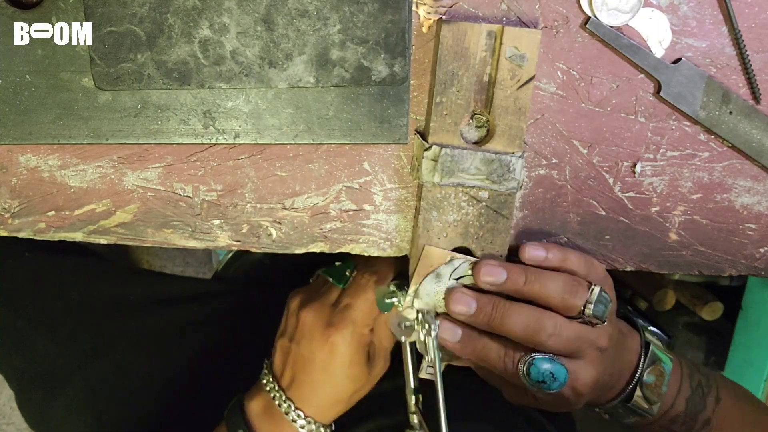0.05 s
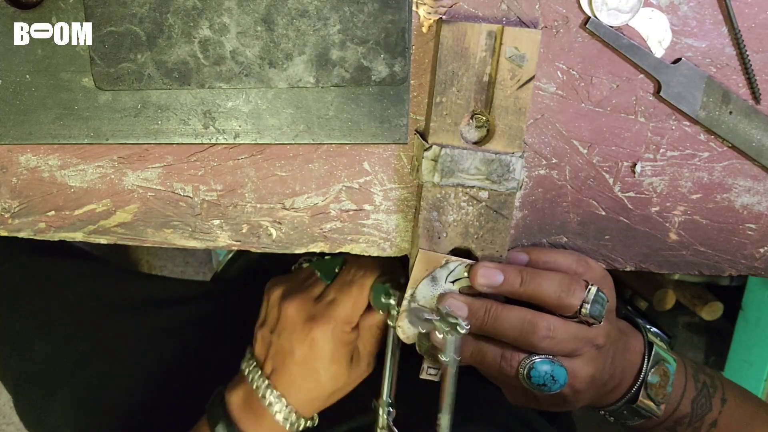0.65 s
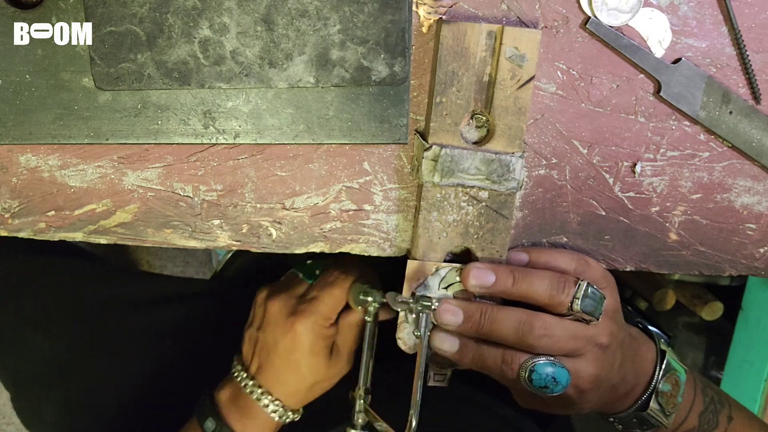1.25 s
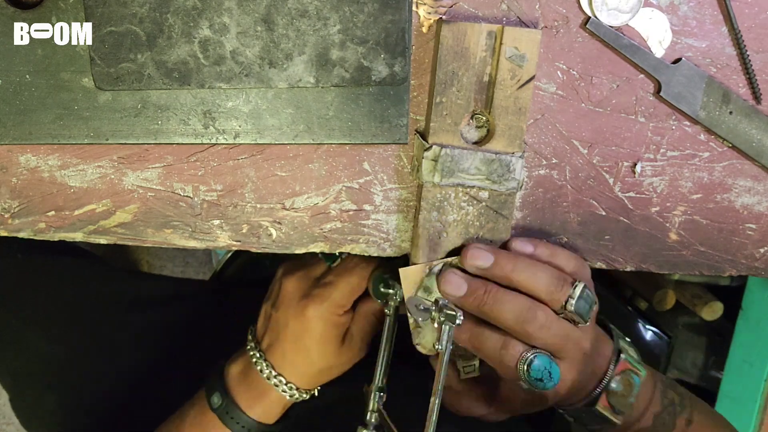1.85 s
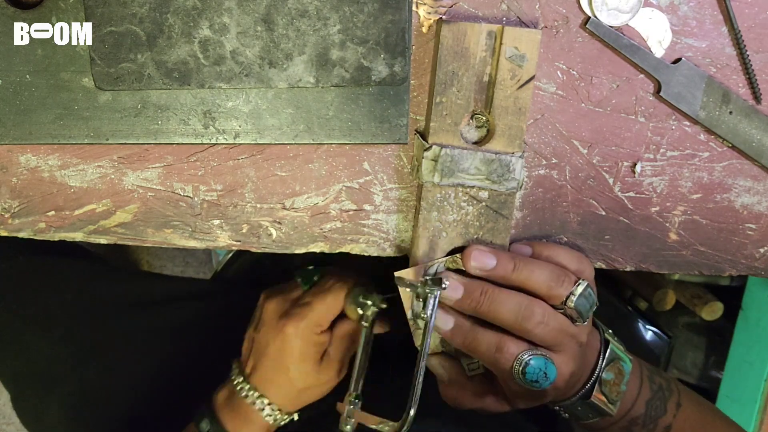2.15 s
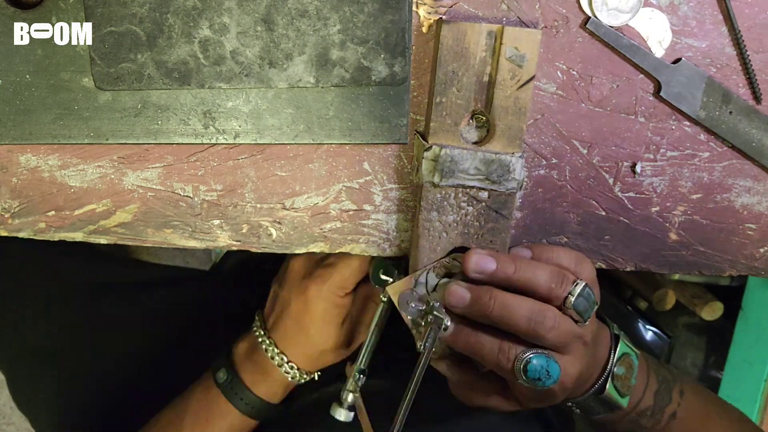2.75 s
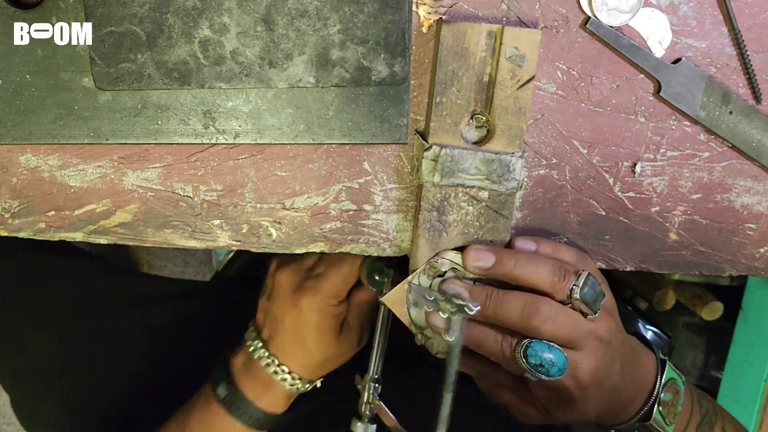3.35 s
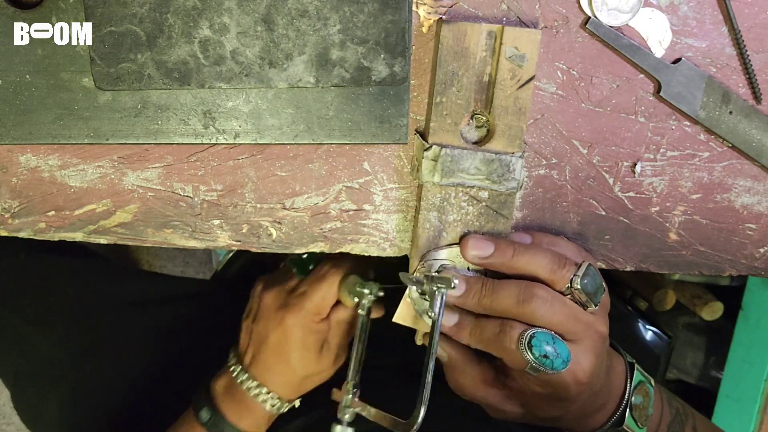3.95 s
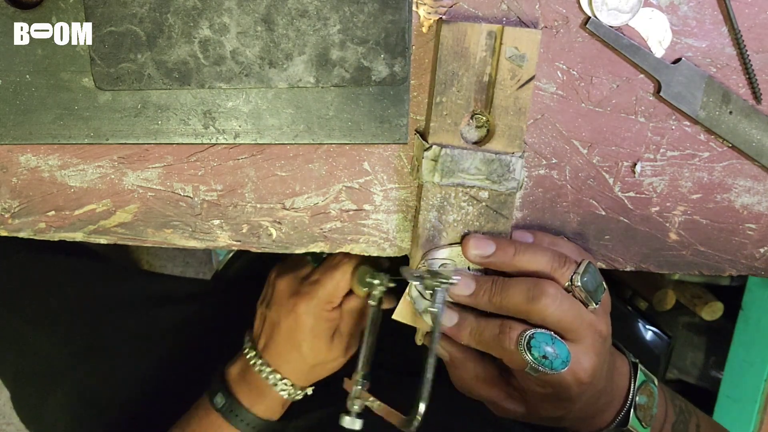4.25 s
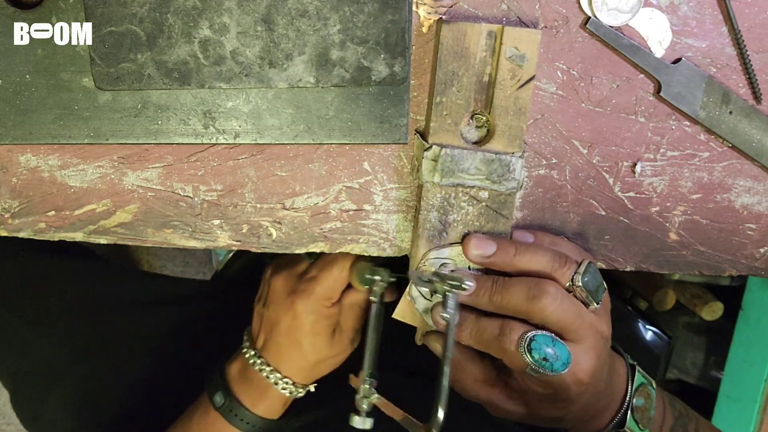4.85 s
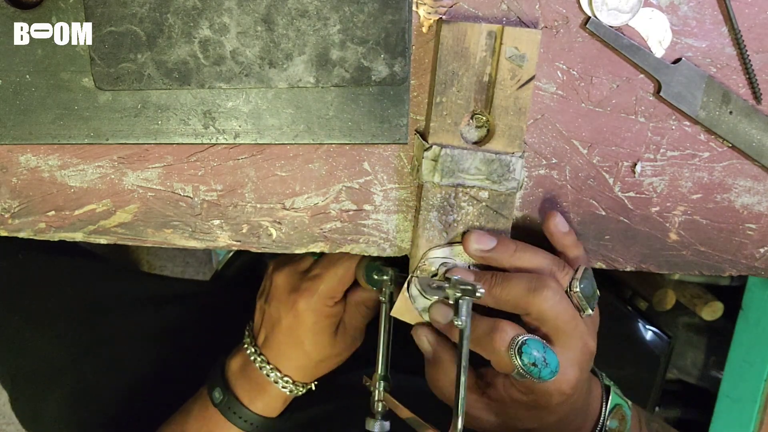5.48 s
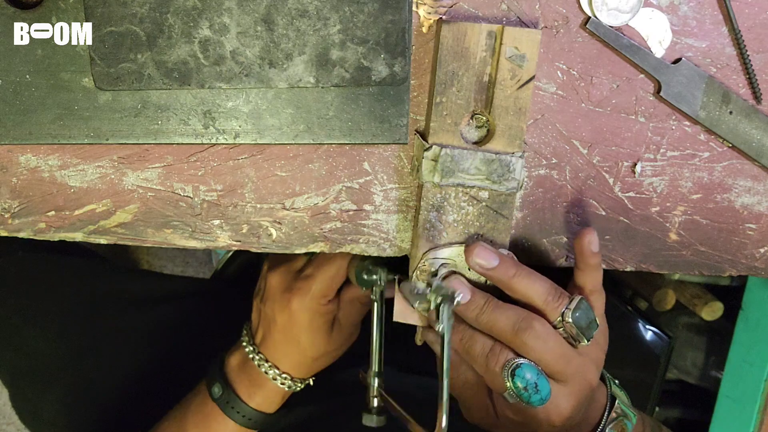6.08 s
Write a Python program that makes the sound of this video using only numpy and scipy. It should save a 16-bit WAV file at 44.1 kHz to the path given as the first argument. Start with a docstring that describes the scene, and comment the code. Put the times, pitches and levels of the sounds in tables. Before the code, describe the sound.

A fine-toothed hand saw rasps through a small metal plate, close by in a quiet workshop. The strokes are at first very fast, as if sped up, and come in runs split by abrupt little gaps. They then give way to slower strokes that rise and fall in pitch. The metal rings thinly while the wooden bench rumbles and thuds softly. At the end the saw frame knocks with a sharp click.

```python
"""Sawing a small metal plate

A fine-toothed hand saw rasps through a plate held on a wooden bench peg, close by in a workshop.
Very fast strokes, sounding sped up and broken by abrupt gaps, give way to slow ones that arch in pitch.
Tooth impacts and chip noise force plate and saw frame to resonate, while the bench rumbles and thuds.
The frame knocks on the peg now and then, hardest at the end, where it also snaps against the plate."""
import sys
import numpy as np
from scipy import signal
from scipy.fft import rfft, irfft, next_fast_len
from scipy.io import wavfile
from scipy.ndimage import uniform_filter1d, map_coordinates

SR = 44100
rng = np.random.default_rng(int(sys.argv[2]) if len(sys.argv) > 2 else 0)


def log_audio(samples):
    """Write samples as a 16-bit WAV file to the path given in sys.argv[1]."""
    # one column per channel
    frames = np.atleast_2d(samples).T
    # limit to full scale, then quantise
    limited = np.clip(frames, -1, 1)
    pcm = np.round(limited * 32767).astype(np.int16)
    wavfile.write(sys.argv[1], SR, pcm)


N = 269892
TIME = np.arange(N) / SR
SIZE = next_fast_len(N + 16384)
FREQ = np.arange(SIZE // 2 + 1) * SR / SIZE

# Runs of quick strokes, each with its own grip: (first t/s, last t/s, strokes, level/dB, attack/s,
# release/s, low plate tones/dB, upper plate tones/dB, frame/dB, bench rumble/dB)
QUICK_RUNS = [(0.003, 0.068, 3, -26.5, 0.0062, 0.025, 1.5, -3, -8, -33.5),
              (0.143, 0.273, 5, -28, 0.051, 0.0049, -8, -5, -7.5, -37),
              (0.48, 0.518, 2, -28.5, 0.013, 0.016, 3.5, 4, -0.5, -36),
              (0.552, 0.815, 9, -27.5, 0.072, 0.027, 0.5, 3, -2, -44.5),
              (0.905, 1.281, 12, -29.5, 0.072, 0.0064, 0.5, 1.5, -5, -45),
              (1.317, 1.714, 12, -27, 0.012, 0.054, 0.5, -2, -6, -46),
              (1.773, 2.525, 22, -27.5, 0.011, 0.015, 1.5, -2.5, -10.5, -47),
              (2.596, 2.635, 2, -42, .01, 0.12, 3.5, -2.5, -7, -48),
              (2.728, 3.438, 21, -26.5, 0.043, 0.054, 1, -7, -8, -40.5),
              (3.49, 3.698, 7, -27, 0.024, 0.011, -1, -4, -4.5, -41),
              (3.87, 4.292, 13, -27, 0.081, 0.011, 2, -3.5, -7.5, -41.5)]
# Slow strokes: (start t/s, end t/s, mid-stroke tooth f/Hz, level/dB,
# swell exponent (1 is round, more is pointed), plate tones/dB, bench rumble/dB)
SLOW_STROKES = [(4.305, 4.417, 799.5, -21.5, 2.6, -0.5, -39.5), (4.415, 4.562, 980, -18.5, 1.1, -3, -40.5),
                (4.552, 4.709, 846.6, -19.5, 1.08, 1, -38), (4.716, 4.874, 637.8, -23, 1.05, 0, -37.5),
                (4.886, 5.032, 713, -24, 1.36, 1.5, -42.5), (5.037, 5.185, 846.6, -22, 0.85, 0, -42),
                (5.178, 5.333, 798.7, -22.5, 1.35, 1, -43), (5.344, 5.483, 469, -31.5, 0.83, 0, -44),
                (5.56, 5.691, 334, -49, 0.9, 3, -48.5), (5.81, 5.999, 625, -31, 2.1, -1.5, -54.5),
                (6, 6.127, 557, -27.5, 1.33, 1, -46.5)]
# Snags of the blade within a stroke: (t/s, level/dB)
BLADE_SNAGS = [(.278, -28), (.68, -28.5), (.745, -27.5), (.975, -29.5), (1.005, -26.5), (1.107, -26.5),
               (1.387, -29), (1.458, -27.5), (1.496, -30), (1.566, -24.5), (1.642, -30.5), (1.805, -22.5),
               (1.881, -25.5), (1.917, -26), (1.95, -28.5), (2.021, -26.5), (2.128, -24), (2.165, -29),
               (2.38, -26.5), (2.415, -26.5), (2.487, -23.5), (2.795, -30), (2.972, -31), (3.006, -34),
               (3.146, -29.5), (3.33, -29), (3.555, -22.5), (3.665, -30.5), (3.696, -30), (4.015, -28),
               (4.08, -31.5), (4.114, -32), (4.336, -17.5), (4.358, -26.5), (4.436, -31), (4.525, -29),
               (4.59, -19.5), (4.62, -14), (4.781, -17.5), (4.935, -23), (5.142, -21.5), (5.218, -24.5),
               (5.535, -53)]
# Spectral envelope of plate and frame in slow strokes and ticks: (f/Hz, level/dB)
METAL_SPECTRUM = [(150, -31.5), (400, -7), (620, -5.5), (1300, -4.5), (2600, -7), (4600, -9.5),
                  (6900, -0.5), (8600, 4), (9600, -2), (10700, -18), (15500, -20.5)]
# Their resonances and one antiresonance: (f/Hz, bandwidth/Hz, gain/dB)
METAL_MODES = [(389, 60, 11), (528.8, 57, 13.5), (790, 110, 3), (943, 84, -17.5), (1560, 65.3, 9.5),
               (2428, 220, 5.5), (3970, 220, 5.5), (6090, 190, 5.5), (6830, 120, 8)]
QUICK_PART = TIME < SLOW_STROKES[0][0]


def undb(db):
    """Amplitude ratio of a level in decibels."""
    return 10 ** (np.asarray(db) / 20)


def unit(x):
    """Normalisation to an rms of 1."""
    return x / np.sqrt(np.mean(np.abs(x) ** 2))


def spectrum_db(points):
    """Interpolation of (f/Hz, level/dB) points on a logarithmic frequency axis."""
    hz, db = np.transpose(points)
    return np.interp(np.log(FREQ + 1), np.log(hz), db)


def minimum_phase(gain):
    """Causality: a minimum-phase response of this gain rings after a blow, never before."""
    cepstrum = irfft(np.log(gain + 1e-7), SIZE)
    cepstrum[..., 1:SIZE // 2] *= 2
    cepstrum[..., SIZE // 2 + 1:] = 0
    return np.exp(rfft(cepstrum))


def through(x, response):
    """Linear filtering: the spectrum is multiplied by a frequency response."""
    return irfft(rfft(x, SIZE) * response, SIZE)[..., :N]


def wander(rate_hz):
    """Random modulation of rms 1, with rate_hz turning points a second."""
    return unit(np.interp(TIME * rate_hz, np.arange(N), rng.standard_normal(N)))


def metal_response(spectrum, modes):
    """Modal resonance: Lorentzian peaks on a broad envelope, coloured differently left and right."""
    balance = [(500, 0.5), (1500, -3.5), (3500, -1.5), (5600, -3), (7000, -12), (8600, -22), (9700, -11),
               (10700, 6), (15000, -4)]  # channel difference: (f/Hz, left minus right level/dB)
    peaks_db = sum(gain / (1 + (2 * (FREQ - hz) / width) ** 2) for hz, width, gain in modes)
    sides = undb(np.array([[.5], [-.5]]) * spectrum_db(balance))
    sides /= np.sqrt(np.mean(sides ** 2, axis=0))
    return unit(minimum_phase(undb(spectrum_db(spectrum) + peaks_db) * sides))


def quick_strokes(scatter_db=-.82, slip_s=.0018, jolt_db=.5, jolt_s=.17):
    """Nearly periodic forcing: very fast, sped-up-sounding strokes; each run swells in and fades out."""
    rows = []  # (t/s, force/dB, rumble/dB)
    for first, last, count, db, attack_s, release_s, *_, rumble_db in QUICK_RUNS:
        s, beat = np.linspace(first, last, int(round(count)), retstep=True)
        slip, scatter = rng.standard_normal((len(s), 2)).T
        swell = np.tanh((s - first + beat / 2) / attack_s) * np.tanh((last - s + beat / 2) / release_s)
        force_db = db + 20 * np.log10(swell) + scatter_db * scatter
        jolt = jolt_db * np.exp((first - s) / jolt_s)  # setting off jolts the bench
        rows += zip(s + slip_s * slip, force_db, rumble_db + jolt)
    return np.array(rows)


def stroke_phase(strokes):
    """Phase of the quick strokes in cycles: a whole number at the middle of each."""
    return np.interp(TIME, np.sort(strokes[:, 0]), np.arange(len(strokes)))


def rasp_spans(uneven_db=1.5):
    """Gating: the rasp starts and stops abruptly. Gives the gate (0 to 1) and an uneven drag force."""
    spans = [(0, 0.08, -48), (0.115, 0.291, -32.5), (0.3, 0.364, -57), (0.375, 0.41, -53.5),
             (0.451, 0.522, -42.5), (0.535, 0.834, -41.5), (0.876, 1.745, -37), (1.75, 2.55, -36),
             (2.545, 2.678, -60.5), (2.681, 2.707, -47.5), (2.712, 3.446, -37), (3.473, 3.739, -38.5),
             (3.847, 4.32, -38), (4.321, 5.488, -45.5), (5.574, 5.683, -63), (5.796, 5.97, -46.5)]  # spans where the rasp sounds: (start t/s, stop t/s, level/dB)
    drag = np.zeros(N)
    for start, stop, db in spans:
        drag[(TIME > start) & (TIME < stop)] = undb(db)
    gate = uniform_filter1d(1. * (drag > 0), size=600)
    return gate, uniform_filter1d(drag, size=750) * undb(uneven_db * wander(110))


def bites(rows, width_s):
    """Incoherent addition: Gaussian swells of force at (t/s, level/dB) sum in power."""
    power = np.zeros(N)
    for s, db in rows:
        near = slice(max(0, int((s - 4 * width_s) * SR)), int((s + 4 * width_s) * SR))
        power[near] += undb(db) ** 2 * np.exp(-((TIME[near] - s) / width_s) ** 2)
    return np.sqrt(power)


def teeth(rate_hz, jitter, scatter_db, strike_db, soft_hz, chips_spread_db, chips_cycles, shared=.88):
    """Impulse-train excitation: each tooth strikes softly with its own force, then chips crackle off."""
    phase = np.cumsum(rate_hz * (1 + jitter * wander(400))) / SR
    tooth = phase.astype(int)
    force = undb(scatter_db * np.clip(rng.standard_normal(N), -2, 2))[tooth]
    impulses = np.diff(tooth, prepend=0) * np.sqrt(SR / rate_hz)
    strikes = signal.sosfilt(signal.butter(2, [200, soft_hz], "band", fs=SR, output="sos"), impulses)
    grit = rng.standard_normal((2, N)) + shared * rng.standard_normal(N)  # partly alike left and right
    crackle = undb(chips_spread_db * np.clip(wander(1500), -2, 1))
    chips = unit(grit * crackle * np.exp(-(phase % 1) / chips_cycles))
    return unit(force * (undb(strike_db) * strikes + chips))


def singing(force, waver=.45, waver_hz=45, steadiness=.65):
    """Narrow resonances of plate and blade follow the force, gliding as grip and free length shift."""
    # Gliding tones: (start t/s, end t/s, first f/Hz, last f/Hz, bandwidth/Hz, relative level/dB)
    glides = [(.03, 0.065, 3710, 3724, 131, 0), (0.12, 0.17, 1254, 1380, 160, 1),
              (.16, 0.2, 648, 505, 112, -2), (0.2, 0.25, 1033, 960, 116, -3),
              (.215, .25, 380, 270, 135, -0.5), (0.22, .29, 10000, 10200, 1190, -22),
              (0.9, 1.53, 1573, 1520, 210, -3), (0.9, 1.73, 790, 750, 142.2, -3),
              (.5, 2.6, 2670, 2620, 223, -7), (.9, 1.28, 1839, 1762, 261, -1.5),
              (1.78, 2.71, 1021, 798, 201, -9), (2.11, 2.523, 1560, 1467, 160.1, -1.5),
              (2.72, 3.04, 927, 969, 139.4, -7), (2.78, 3.3, 4950, 4850, 600, -10),
              (.272, .292, 3980, 4120, 300, -5), (2.97, 3.6, 767.6, 693, 129, -6.5),
              (3.1, 3.45, 980, 569.4, 131, -2.5), (3.44, 4.34, 3777, 3700, 321, -7),
              (3.48, 4.23, 562, 540, 89.5, -5), (3.7, 4.52, 1796, 1650, 231.6, -8),
              (3.9, 4.7, 5600, 5750, 217, -12), (4.3, 4.86, 3950, 3975, 130.8, -13),
              (4.6, 4.7, 1453, 1654, 140, -6.5), (4.67, 4.74, 566, 516, 80, -1.5),
              (4.772, 4.57, 531.5, 547, 80, -1.5)]
    out, detuning = np.zeros((2, N)), waver * wander(waver_hz)
    rub = rng.standard_normal((2, N)) + 1j * rng.standard_normal((2, N))
    for start, end, first_hz, last_hz, width_hz, db in glides:
        near = (TIME > start) & (TIME < end + .03)
        hz = np.interp(TIME[near], [start, end], [first_hz, last_hz]) + width_hz * detuning[near]
        carrier = np.exp(2j * np.pi * np.cumsum(hz) / SR)
        inertia = signal.butter(2, width_hz / 2, fs=SR)
        ring = signal.lfilter(*inertia, rub[:, near])
        ring = unit(ring / np.abs(ring) ** steadiness)  # evens out the amplitude
        swell = signal.lfilter(*inertia, force[near] * (TIME[near] < end))
        out[:, near] += undb(db) * np.sqrt(2) * swell * np.real(ring * carrier)
    return out


def quick_sawing(strokes, gate, drag, turn_share=.58, flutter_db=1.71, hiss_db=-3):
    """Forced vibration: teeth drive the metal in quick strokes; the grip decides which registers ring."""
    pace = [(0, 649), (.9, 848.2), (1.5, 798.4), (2.95, 962), (3.35, 763.7), (4.3, 939)]  # tooth-passing rate at mid stroke: (t/s, f/Hz)
    spectrum = [(150, -22.5), (430, -11), (560, -5.5), (800, -5.5), (1250, -4.5), (2300, -7), (4500, -14.5),
                (7000, -16), (8700, -11), (10600, -32), (12000, -29.5), (15500, -35)]  # spectral envelope of plate and frame: (f/Hz, level/dB)
    modes = [(536, 73, 5), (716, 120, 8), (980, 110, 4), (1509, 130, 7.5), (1775, 100, 6), (2137, 106, 4.5),
             (2670, 130, 9), (3070, 160, 3), (8370, 390, 7), (8970, 540, 8)]  # their resonances: (f/Hz, bandwidth/Hz, gain/dB)
    # Borders between low plate tones, upper plate tones, frame and blade hiss: f/Hz
    register_edges = [1250, 3200, 7400]
    bite_widths = [.0085, .0087, .0102, .0116]  # half length of a stroke in each register: t/s
    speed = np.abs(np.cos(np.pi * stroke_phase(strokes)))
    rate_hz = np.interp(TIME, *np.transpose(pace)) * (turn_share + (1 - turn_share) * speed)
    rate_hz *= undb(1.3 * wander(35))
    rub = QUICK_PART * np.hypot(drag, bites(BLADE_SNAGS, width_s=.0085))
    forces = [gate * np.hypot(rub, bites(strokes[:, :2], width_s)) for width_s in bite_widths]
    drive = teeth(rate_hz, jitter=.1, scatter_db=1.64, strike_db=2, soft_hz=2050,
                  chips_spread_db=2, chips_cycles=1.3)
    body = metal_response(spectrum, modes)
    first, last, *_, low_db, upper_db, frame_db, _ = np.transpose(QUICK_RUNS)
    grip_db = [np.interp(TIME, (first + last) / 2, db) for db in (low_db, upper_db, frame_db)]
    register = np.searchsorted(register_edges, FREQ)
    out = undb(-2) * singing(forces[0])
    for k, (force, share_db) in enumerate(zip(forces, grip_db + [hiss_db])):
        band = uniform_filter1d(1. * (register == k), size=2000)
        voice = unit(through(force * drive, body * band))
        out += voice * force.std() * undb(share_db + flutter_db * wander(60))
    return out


def sway(x, strokes, depth_s=.00014, rate_hz=26, flex_s=.0001):
    """Delay modulation: pitch wavers as saw and plate shift, and arches as strokes tighten the blade."""
    flex = flex_s * np.sin(2 * np.pi * stroke_phase(strokes))
    position = (TIME + depth_s * wander(rate_hz) + flex) * SR
    return np.array([map_coordinates(channel, [position], order=3, mode="nearest") for channel in x])


def reflections(x, t60_s=.051, echo_db=5, shift_hz=5, paths=5):
    """Multipath interference: echoes off bench and tools join the sound, shifting as the hands move."""
    t = TIME[:4096]
    tails = rng.standard_normal((paths, 2, len(t))) * undb(-60 * t / t60_s)
    tails /= np.sqrt(np.sum(tails ** 2, axis=-1, keepdims=True))
    shares = np.array([wander(shift_hz) for _ in tails])
    shares /= np.sqrt(np.sum(shares ** 2, axis=0))
    echoes = sum(signal.oaconvolve(x * share, tail, axes=-1)[:, :N] for share, tail in zip(shares, tails))
    return (x + undb(echo_db) * echoes) / np.hypot(1, undb(echo_db))


def workshop_air(level_db=-64.5):
    """Ambient noise: the still air of the workshop is a faint, stationary, mostly low rush."""
    spectrum = [(70, 3.5), (400, -20.5), (9000, -27), (12000, -41.5)]  # spectral envelope of the air: (f/Hz, level/dB)
    return undb(level_db) * unit(through(rng.standard_normal((2, N)), undb(spectrum_db(spectrum))))


def bench_rumble(strokes, gate, shudder_db=3):
    """Structure-borne sound: the heavy bench top rumbles and shudders under the push of every stroke."""
    spectrum = [(20, -33.5), (42, -15), (68, 2), (95, -9), (180, -11), (320, -18.5), (600, -13),
                (2000, -73)]  # response of the bench top: (f/Hz, level/dB)
    shared, *own = rng.standard_normal((3, N))
    quick = bites([(s, db) for s, _, db in strokes], width_s=.026) * uniform_filter1d(gate, size=700)
    slow = bites([((start + end) / 2, db) for start, end, *_, db in SLOW_STROKES], width_s=.084)
    shakes = (.5 * shared + np.array(own)) * undb(shudder_db * wander(30))
    return np.hypot(quick, slow) * unit(through(shakes, minimum_phase(undb(spectrum_db(spectrum)))))


def bench_thuds(decay_s=.0042):
    """Heavily damped oscillation: the bench top swings briefly as the blade bites or the hand presses."""
    pushes = [(.128, 127, -30.5), (.228, 213, -26.5), (.27, 104, -31), (.402, 174, -39.5),
              (2.752, 123.7, -32), (2.762, 230, -40.5)]  # soft pushes on the bench: (t/s, f/Hz, level/dB)
    out = np.zeros(N)
    for s, hz, db in pushes:
        age = np.maximum(TIME - s, 0)
        envelope = age / decay_s * np.exp(1 - age / decay_s)
        out += undb(db) * envelope * np.sin(2 * np.pi * hz * age)
    return out


def peg_knocks(tick_s=.0058, contact_s=.002):
    """Impact excitation: short contacts ring the damped modes of the peg and make the frame tick."""
    impacts = [(0.144, -37, -26), (0.227, -31.5, -24), (.24, -38, -26), (0.388, -47.5, -50),
               (2.762, -40.5, -30), (6.0692, -27, -12.5)]  # frame on peg: (t/s, wood level/dB, metal tick level/dB)
    modes = [(296, -3.5, 0.053), (396, -5, 0.022), (503, 8, 0.069), (846, -8.5, 0.063), (1105, -13, 0.099)]  # modes of the wooden peg: (f/Hz, level/dB, T60/s)
    wood, tick = np.zeros(N), np.zeros(N)
    for s, wood_db, tick_db in impacts:
        near = (TIME > s) & (TIME < s + .5)
        age = TIME[near] - s
        ring = sum(undb(db - 60 * age / t60) * np.sin(2 * np.pi * hz * age) for hz, db, t60 in modes)
        wood[near] += undb(wood_db) * ring * (1 - np.exp(-age / contact_s))
        tick[near] += undb(tick_db) * np.exp(-age / tick_s)
    ticks = through(tick * rng.standard_normal((2, N)), metal_response(METAL_SPECTRUM, METAL_MODES))
    return undb(4) * wood + reflections(ticks)


def slow_sawing(drag, turn_share=.33, hiss_growth=.96, plate_hz=1800, hiss_hz=6000, chatter_db=2):
    """Tooth-passing frequency and force arch with the speed of the arm; the blade chatters and snags."""
    rate_hz, force, plate_db = np.full(N, 300.), np.zeros(N), np.zeros(N)
    for start, end, top_hz, db, swell, tones_db, _ in SLOW_STROKES:
        inside = (TIME > start) & (TIME < end)
        speed = np.abs(np.sin(np.pi * (TIME[inside] - start) / (end - start)))
        rate_hz[inside] = top_hz * (turn_share + (1 - turn_share) * speed)
        force[inside] += undb(db) * speed ** swell
        plate_db[inside] = tones_db
    rub = ~QUICK_PART * np.hypot(drag, bites(BLADE_SNAGS, width_s=.013))
    force = np.hypot(force, rub) * undb(chatter_db * wander(170))
    rate_hz *= undb(.25 * wander(60))
    drive = teeth(rate_hz, jitter=.018, scatter_db=3, strike_db=6, soft_hz=2683,
                  chips_spread_db=-.5, chips_cycles=1)
    body = metal_response(METAL_SPECTRUM, METAL_MODES)
    plate_band = uniform_filter1d(1. * (FREQ < plate_hz), size=4000)
    hiss_band = uniform_filter1d(1. * (FREQ > hiss_hz), size=8000)
    middle_band = 1 - plate_band - hiss_band
    hiss = undb(-24.5) * (force / undb(-22)) ** hiss_growth
    registers = [(force * undb(plate_db), plate_band), (force, middle_band), (hiss, hiss_band)]
    rasp = sum(through(push * drive, body * band) for push, band in registers)
    return undb(-2) * rasp + undb(-5.5) * singing(force)


def frame_click(decay_s=.0013):
    """A brief contact has a broad spectrum: the steel frame snaps on the plate with a bright crack."""
    snaps = [(6.0692, -14)]  # frame on plate: (t/s, level/dB)
    spectrum = [(300, -18), (1500, 3), (4000, -18), (6300, -6), (8700, 4), (11000, -16), (15500, -19)]  # spectral envelope of the crack: (f/Hz, level/dB)
    envelope = sum(undb(db) * (TIME > s) * np.exp(-np.abs(TIME - s) / decay_s) for s, db in snaps)
    return through(envelope * rng.standard_normal((2, N)), metal_response(spectrum, modes=[]))


def scene():
    """Superposition: saw, impacts, bench and air add in two channels."""
    strokes = quick_strokes()
    gate, drag = rasp_spans()
    air = workshop_air()
    sawing = quick_sawing(strokes, gate, drag) + slow_sawing(drag)
    saw = reflections(sway(sawing, strokes))
    return saw + peg_knocks() + bench_thuds() + frame_click() + bench_rumble(strokes, gate) + air


def record(dry):
    """Band limiting: a steep elliptic low-pass filter cuts the highest treble."""
    cutoff_hz = 15800
    return signal.sosfilt(signal.ellip(10, .2, 80, cutoff_hz, fs=SR, output="sos"), dry)


dry = scene()
out = record(dry)
log_audio(out)
```